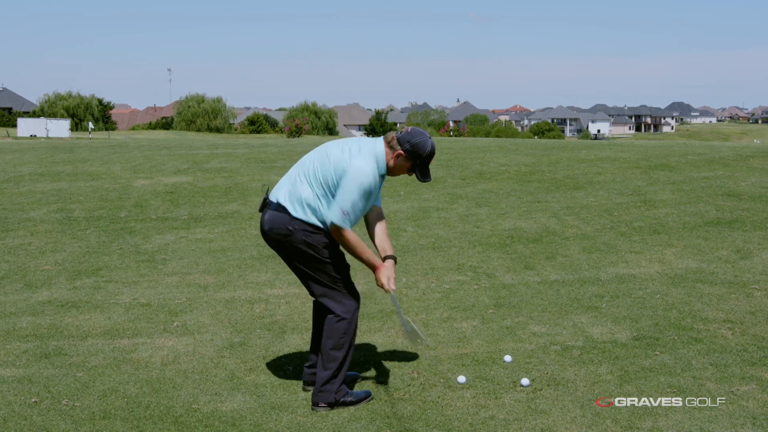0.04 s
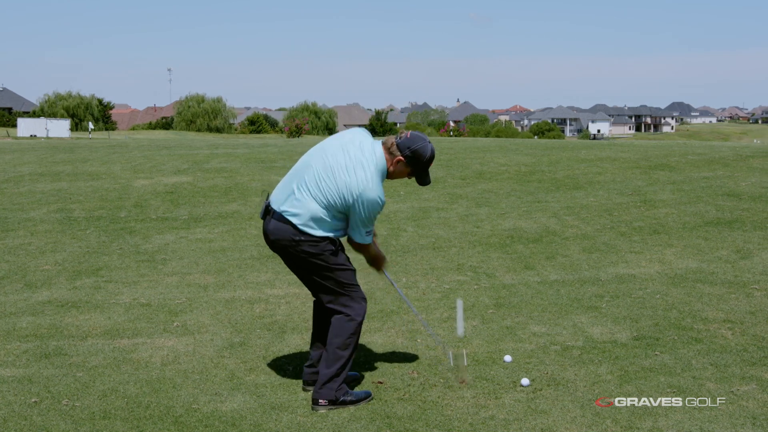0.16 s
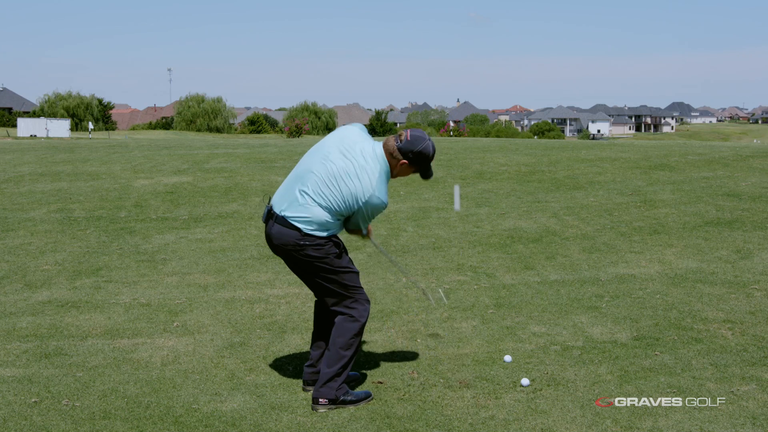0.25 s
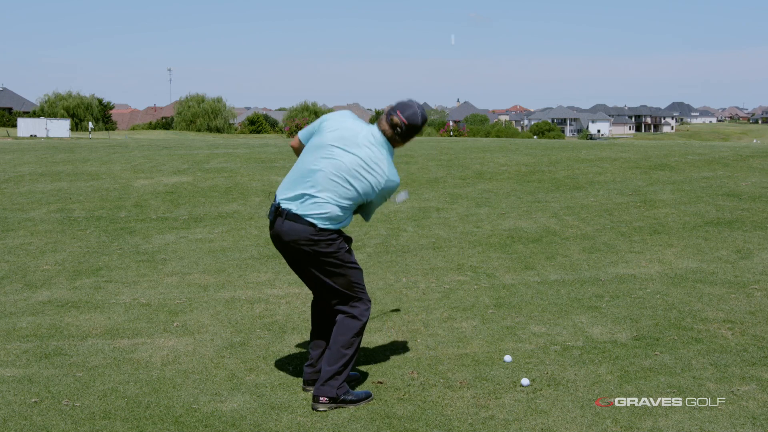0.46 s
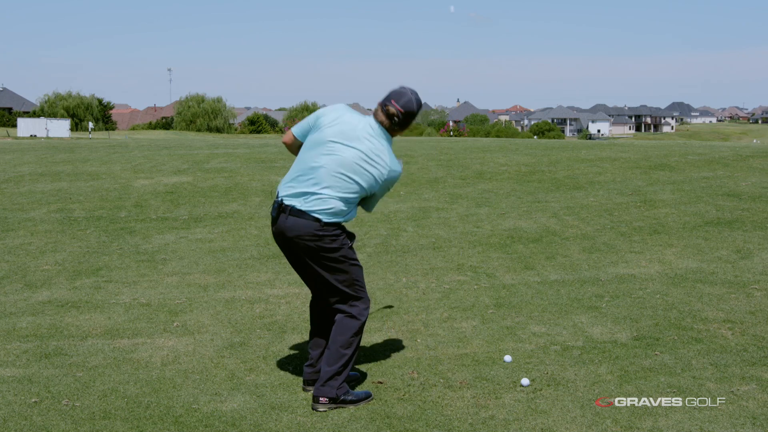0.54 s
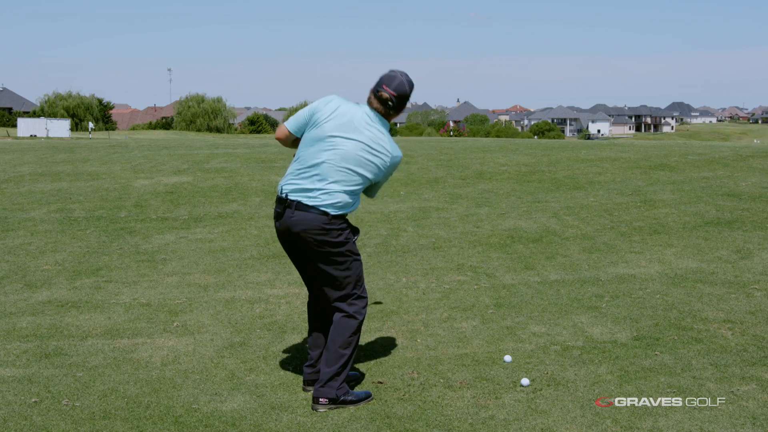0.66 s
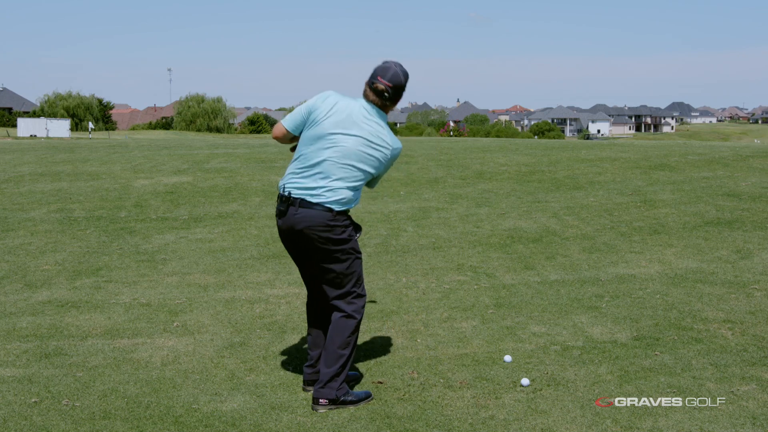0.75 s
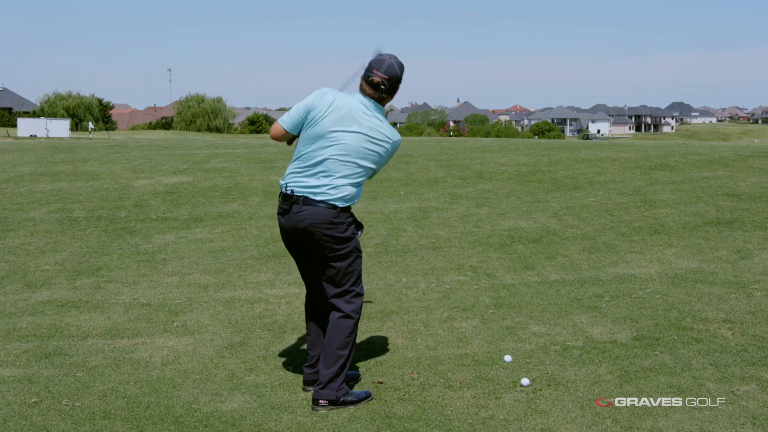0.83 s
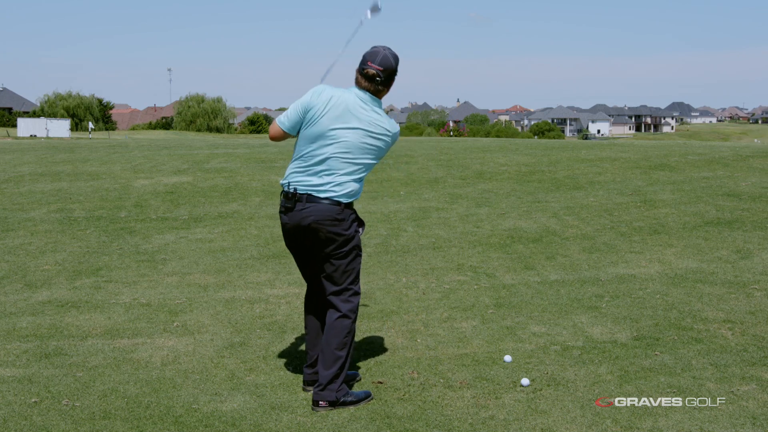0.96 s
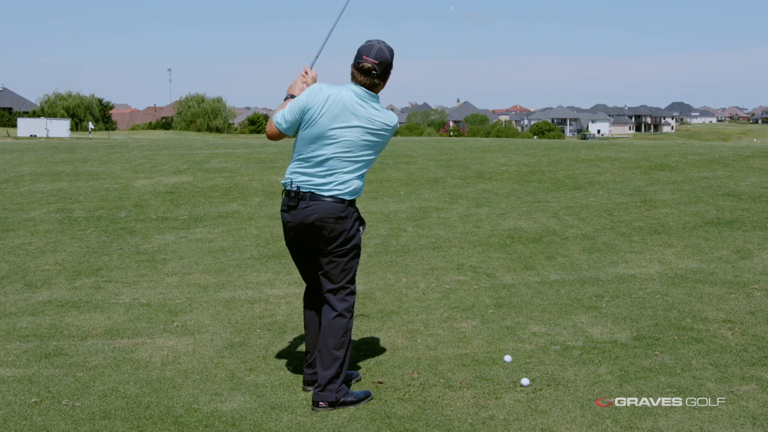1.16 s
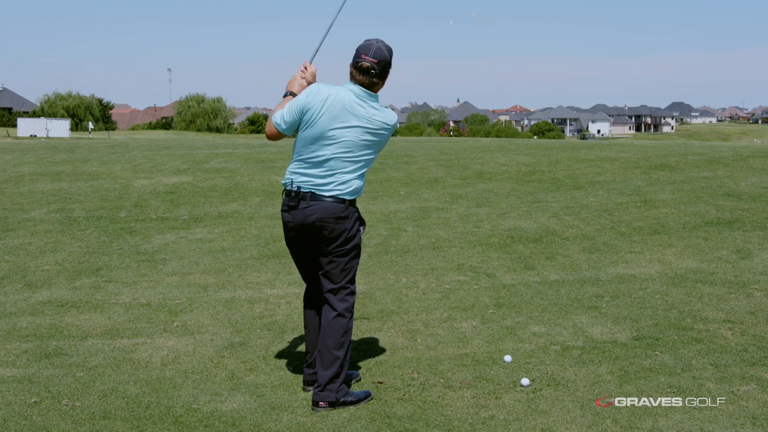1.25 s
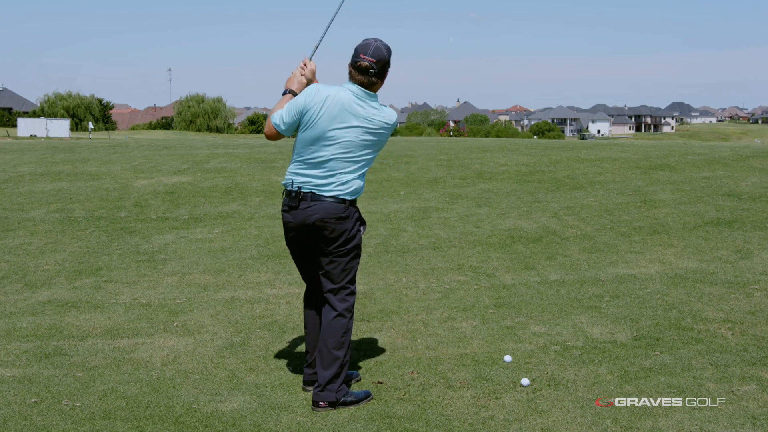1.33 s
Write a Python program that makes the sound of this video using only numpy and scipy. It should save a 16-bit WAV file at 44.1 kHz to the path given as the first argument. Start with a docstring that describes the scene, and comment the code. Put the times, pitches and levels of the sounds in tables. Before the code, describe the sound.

A golf club strikes a ball off turf with one sharp click after a quick swing whoosh

```python
"""A golf iron clicks a ball off the turf, after a swing down and before a follow-through, on an open practice ground.
The blow is damped modes under bursts of noise; the swing is coloured noise that swells and dies.
Grass and soil spray as scattered short sine grains, and small ticks rustle.
Wind rumble, a wavering breeze and a faint outdoor hiss are coloured noises with moving levels."""
import sys
import numpy as np
from scipy import signal
from scipy.fft import rfft, irfft, next_fast_len
from scipy.io import wavfile
from scipy.ndimage import map_coordinates

SR = 44100
rng = np.random.default_rng(int(sys.argv[2]) if len(sys.argv) > 2 else 0)


def wrap_up_sound(samples):
    """Save the sound to the file named by the first command line argument, as 16-bit audio."""
    columns = np.atleast_2d(samples).T
    # keep every value between -1 and 1, then stretch to whole-number steps
    tamed = np.clip(columns, -1, 1)
    steps = np.round(tamed * 32767).astype(np.int16)
    wavfile.write(sys.argv[1], SR, steps)


N = 61739
TOP_HZ = 15800  # upper limit of the grains and of the whole mix
STRIKE_S = .26696

# A t60 is the time to die by 60 dB. Colours are relative noise spectra.
# Low, quickly damped modes of ball and club head. Each row: frequency in Hz, level in dB, t60 in seconds.
KNOCK_MODES = [(211, -31.5, 0.0728), (462, -14.4, 0.0094), (582, -24.3, 0.032), (913, -13.5, 0.0088),
               (1125, -13.9, 0.0141), (1358, -13.4, 0.0121), (1882, -8.8, 0.0117), (2039, -5.6, 0.0064),
               (2603, -7.3, 0.0061)]
# Higher modes that ring just after the contact. Each row: frequency in Hz, level in dB, t60 in seconds.
RING_MODES = [(2808, -20.9, .0105), (3430, -11.7, .019), (3666, -8.2, .0163), (4008, -25.8, .0136),
              (5100, -26, .0118), (5408, -23.6, .0098), (5659, -19, .007), (7590, -19.5, .0067),
              (9013, -27.5, .0091), (9250, -21, .0062), (11850, -24.5, .0094), (12680, -21.5, .0075)]
# Colour of the rough edge on the ring. Each row: frequency in Hz, density in dB per Hz.
RASP_COLOUR = [(1500, -22), (2900, -16), (3150, -2), (3800, 0), (4200, -6), (4600, -20), (9000, -32)]
# Colour shared by the crack and the turf scrape. Each row: frequency in Hz, density in dB per Hz.
CRACK_COLOUR = [(200, -3), (1500, 0), (2700, 2), (4000, 1), (6500, -2.5), (9700, 0), (10900, -9),
                (12600, 0), (14200, -1), (15500, -8)]
# Colour of the air on the way down. Each row: frequency in Hz, density in dB per Hz.
DOWNSWING_COLOUR = [(100, -1), (220, 0), (400, -1.5), (550, -7), (750, -3.5), (1000, -9), (1300, -20),
                    (2100, -14.5), (3800, -24), (15500, -38)]
# Colour of the fine hiss in the fast part of the swing. Each row: frequency in Hz, density in dB per Hz.
FIZZ_COLOUR = [(1000, -14), (4000, 1.5), (10000, -1.5), (15500, -4)]
# Colour of the shaft whipping past. Each row: frequency in Hz, density in dB per Hz.
WHIP_COLOUR = [(150, 1), (260, 4), (450, -3), (680, -6), (900, 4), (1170, -6), (1900, 0), (3000, -5),
               (5000, -14), (8000, -21.5), (15500, -29)]
# Dull thumps of air, turf and feet.
# Each row: start in seconds, frequency in Hz, level in dB, rise constant in seconds, t60 in seconds.
THUMPS = [(.1765, 300, -32.5, .0005, .012), (.2155, 100, -17, .003, .037), (.2168, 250, -32.5, .001, .02),
          (.2675, 150, -27.5, .0005, .026), (.294, 65, -29, .003, .07), (.383, 600, -44, .0006, .012),
          (.551, 78, -32, .003, .12), (.725, 72, -41, .004, .1), (1.026, 80, -36.5, .003, .08),
          (1.114, 230, -39.5, .0005, .024), (1.1205, 105, -38.5, .001, .055), (1.354, 88, -39, .0015, .11)]
# Path of the follow-through swish. Each row: time in seconds, centre in Hz, level in dB.
SWISH_PATH = [(.44, 6700, -85), (.54, 7000, -80), (.63, 8200, -75), (.70, 8300, -89)]
# Faint ticks of clothing and grass. Each row: peak time in seconds, level in dB.
TICKS = [(.085, -67), (1.241, -67), (1.291, -70)]
# Colour of the ticks. Each row: frequency in Hz, density in dB per Hz.
TICK_COLOUR = [(1500, -8), (3800, 0), (7000, -10), (15500, -20)]
# Wind on the microphone. Each row: time in seconds, level in dB.
WIND_LEVEL = [(0, -52), (.08, -55), (.17, -52), (.26, -50), (.305, -44.5), (.39, -44.5), (.46, -49),
              (.50, -47.5), (.535, -54), (.59, -47), (.63, -50.5), (.68, -49.5), (.74, -49), (.79, -53),
              (.85, -50.5), (.92, -54), (.965, -50.5), (1.0, -54), (1.08, -57), (1.3, -56.5), (1.4, -54.5)]
# Colour of the wind rumble. Each row: frequency in Hz, density in dB per Hz.
WIND_COLOUR = [(20, -12), (50, -1.5), (80, 2), (130, -5), (200, -12.5), (300, -20), (420, -29), (600, -38),
               (1200, -60)]
# Breeze over the field, before its waver. Each row: time in seconds, level in dB.
BREEZE_LEVEL = [(0, -69), (.08, -67), (.45, -71), (.55, -65.5), (.65, -65), (.74, -68), (.83, -67),
                (.95, -71), (1.05, -68.5), (1.25, -66), (1.4, -67)]
# Colour of the breeze. Each row: frequency in Hz, density in dB per Hz.
BREEZE_COLOUR = [(150, -10), (340, 7), (550, 0), (1000, -1), (1600, -8), (2600, -14), (5000, -25)]
# Outdoor hiss. Each row: time in seconds, level in dB.
AIR_LEVEL = [(0, -65), (.17, -65), (.45, -65.5), (.63, -63), (.75, -65.3), (1.0, -65.3), (1.25, -63.7),
             (1.4, -63.7)]
# Colour of the outdoor hiss. Each row: frequency in Hz, density in dB per Hz.
AIR_COLOUR = [(100, 10), (210, 12.5), (400, 1), (600, -3), (950, -2), (1500, -7), (3000, -10.2),
              (5400, -11), (7000, -15.7), (12000, -20.3), (13500, -26), (15500, -30)]


def strike():
    """The face meets the ball: knock, ring and rasp, a crack and the scrape of the sole in the turf."""
    return knock() + ring() + rasp() + crack() + scrape()


def knock():
    """Low modes of ball and club head sound as damped sines, made hollow by two narrow dips."""
    sound = np.zeros(N)
    # neighbouring modes alternate in sign, which fills the valleys between their pitches
    for k, (hz, level_db, t60_s) in enumerate(KNOCK_MODES):
        sound += (-1) ** k * mode(STRIKE_S, hz, level_db, rise_s=.00023, t60_s=t60_s)
    for dip_hz in (1604, 2869):
        b, a = signal.iirnotch(dip_hz, Q=8, fs=SR)
        sound = signal.lfilter(b, a, sound)
    return sound


def ring():
    """Higher modes start together just after the contact and ring for milliseconds."""
    lag_s, rise_s = .00179, .00036
    return sum(mode(STRIKE_S + lag_s, hz, level_db, rise_s, t60_s) for hz, level_db, t60_s in RING_MODES)


def rasp():
    """A short band of noise around the main ring pitches roughens the ring as it dies."""
    return burst(peak_s=.273, level_db=-37, rise_s=.03, t60_s=.03) * noise(RASP_COLOUR)


def crack():
    """The face cracks on ball and turf as a short burst of noise."""
    return burst(peak_s=.269, level_db=-24.3, rise_s=.0105, t60_s=.007) * noise(CRACK_COLOUR)


def scrape():
    """The sole scrapes the turf: a softer, longer burst in the colour of the crack."""
    return burst(peak_s=.273, level_db=-38, rise_s=.034, t60_s=.026) * noise(CRACK_COLOUR)


def swing():
    """Air rushes and fizzes with the swing, the shaft whips past after the blow, and dull thumps join in."""
    downswing = rush(DOWNSWING_COLOUR, start_s=.166, rise_s=.042, hold_s=.018, t60_s=.17, level_db=-48.6)
    fizz = rush(FIZZ_COLOUR, start_s=.17, rise_s=.011, hold_s=.148, t60_s=.2, level_db=-64.5)
    whip = burst(peak_s=.334, level_db=-49.5, rise_s=.145, t60_s=.12) * noise(WHIP_COLOUR)
    thumps = sum(mode(*row) for row in THUMPS)
    return downswing + fizz + whip + thumps


def divot():
    """Torn grass and soil spray out as a shower of grains and thin away."""
    return burst(peak_s=.293, level_db=-58.5, rise_s=.06, t60_s=.34) * grains(per_s=900)


def grains(per_s):
    """Snaps of grass blades, each a damped sine of a few cycles, scattered at random to rms 1."""
    centre_hz, log_pitch_spread, cycles, level_spread_db = 3400, .6, 4, 22
    count = int(per_s * N / SR)
    place, loudness = np.hsplit(rng.random((count, 2)), 2)
    hz = centre_hz * np.exp(log_pitch_spread * rng.standard_normal((count, 1)))
    hz = np.minimum(hz, TOP_HZ)
    t = np.arange(SR // 250) / SR  # grains last 4 ms
    snaps = amp(level_spread_db * loudness) * np.sin(2 * np.pi * hz * t) * fade(t, cycles / hz)
    # add each grain at its own place
    at = (place * N).astype(int) + np.arange(len(t))
    return unit(np.bincount(at.ravel(), snaps.ravel(), N)[:N])


def follow_through():
    """A thin band of hiss glides upward: low-passed noise carried on a rising tone."""
    half_width_hz = 900
    hz, level_db = curves(SWISH_PATH)
    band = filtered(rng.standard_normal(N), lambda f: 1 / (1 + (f / half_width_hz) ** 2))
    carrier = np.cos(2 * np.pi * np.cumsum(hz) / SR)
    return amp(level_db) * unit(band * carrier)


def rustle():
    """Clothing and grass tick faintly: brief swells of coloured noise."""
    swells = sum(burst(peak_s, level_db, rise_s=.015, t60_s=.04) for peak_s, level_db in TICKS)
    return swells * noise(TICK_COLOUR)


def outdoors():
    """Wind rumbles on the microphone, a breeze wavers over the field and a faint hiss lies beneath."""
    wind_db, = curves(WIND_LEVEL)
    breeze_db, = curves(BREEZE_LEVEL)
    air_db, = curves(AIR_LEVEL)
    waver_db = 1.1 * wobble(knots_per_s=25)
    breeze = amp(breeze_db + waver_db) * noise(BREEZE_COLOUR)
    wind = amp(wind_db) * noise(WIND_COLOUR)
    air = amp(air_db) * noise(AIR_COLOUR)
    return wind + breeze + air


def mode(start_s, hz, level_db, rise_s, t60_s):
    """A struck resonance: a damped sine with a soft start."""
    t = np.maximum(clock() - start_s, 0)
    soft_start = (1 - np.exp(-t / rise_s)) ** 2
    return amp(level_db) * np.sin(2 * np.pi * hz * t) * soft_start * fade(t, t60_s)


def burst(peak_s, level_db, rise_s, t60_s):
    """An envelope that swells by 60 dB per rise time to a point, then dies."""
    return amp(level_db) * fade(peak_s - clock(), rise_s) * fade(clock() - peak_s, t60_s)


def rush(colour, start_s, rise_s, hold_s, t60_s, level_db):
    """Moving air: noise with a gritty flutter that rises, holds and dies."""
    t = clock() - start_s
    envelope = np.clip(t / rise_s, 0, 1) * fade(t - rise_s - hold_s, t60_s)
    grit_db = 1.8 * wobble(knots_per_s=400)
    return amp(level_db) * envelope * unit(amp(grit_db) * noise(colour))


def noise(colour):
    """Noise of rms 1 shaped by a colour table, read along log frequency."""
    f, db = np.transpose(colour)
    shaped = filtered(rng.standard_normal(N), lambda hz: amp(np.interp(np.log(hz + 1), np.log(f + 1), db)))
    return unit(shaped)


def wobble(knots_per_s):
    """A smooth random curve through normally distributed knots."""
    return map_coordinates(rng.standard_normal(N // 20), [clock() * knots_per_s])


def fade(t, t60_s):
    """1 until t = 0, then 60 dB down every t60."""
    return np.exp(-np.log(1000) * np.maximum(t, 0) / t60_s)


def filtered(x, response):
    """x through a gain that depends on frequency, padded so that the end does not wrap round."""
    m = next_fast_len(N + SR // 2)
    return irfft(rfft(x, m) * response(np.fft.rfftfreq(m, 1 / SR)), m)[:N]


def curves(rows):
    """One value per sample for each column after the time."""
    s, *columns = np.transpose(rows)
    return [np.interp(clock(), s, column) for column in columns]


def clock():
    """The time of each sample in seconds."""
    return np.arange(N) / SR


def unit(x):
    """x at rms 1."""
    return x / np.sqrt(np.mean(x ** 2) + 1e-20)


def amp(db):
    """Decibels to gain."""
    return 10 ** (np.asarray(db) / 20)


def scene():
    """All the sources summed into one channel."""
    return (strike() + swing() + divot() + follow_through() + rustle() + outdoors())[None]


def record(dry):
    """A sharp low-pass keeps nothing at or above the band limit."""
    return np.array([filtered(x, lambda hz: hz < TOP_HZ) for x in dry])


dry = scene()
out = record(dry)
wrap_up_sound(out)
```